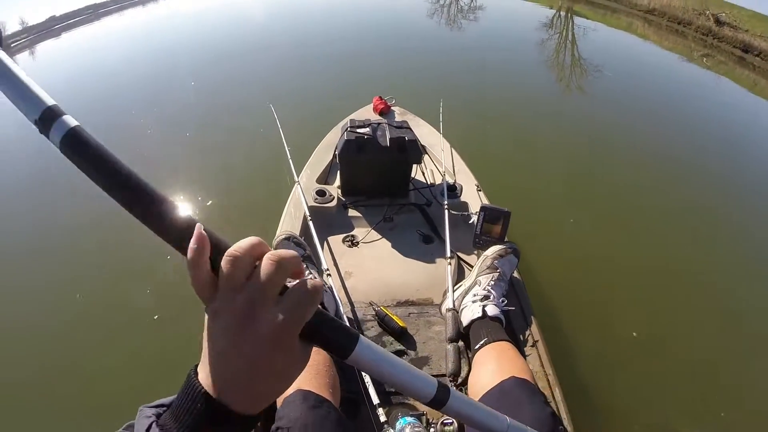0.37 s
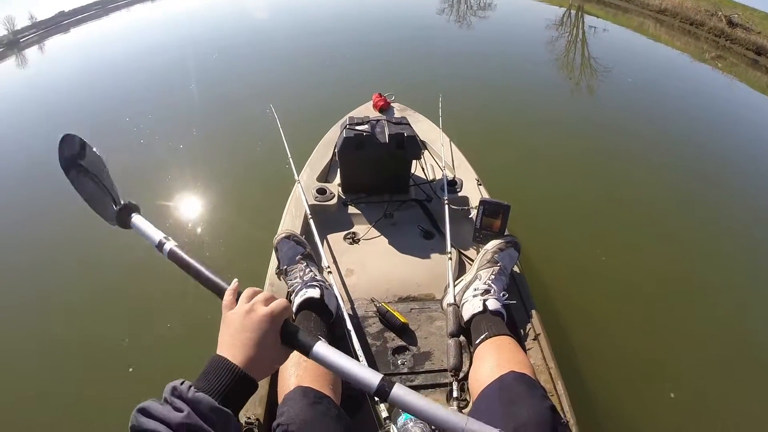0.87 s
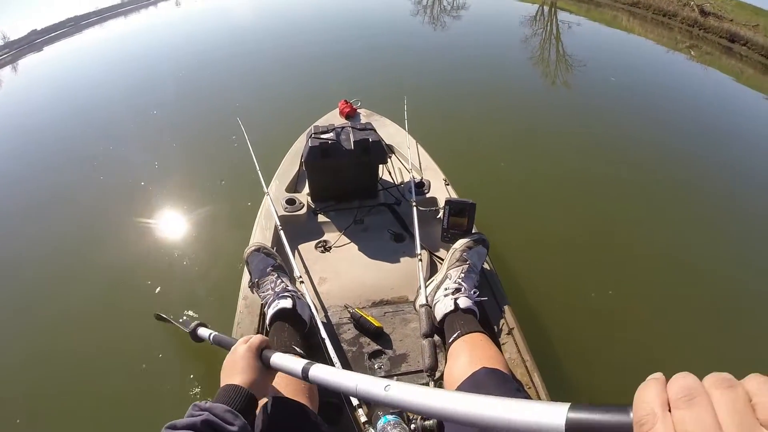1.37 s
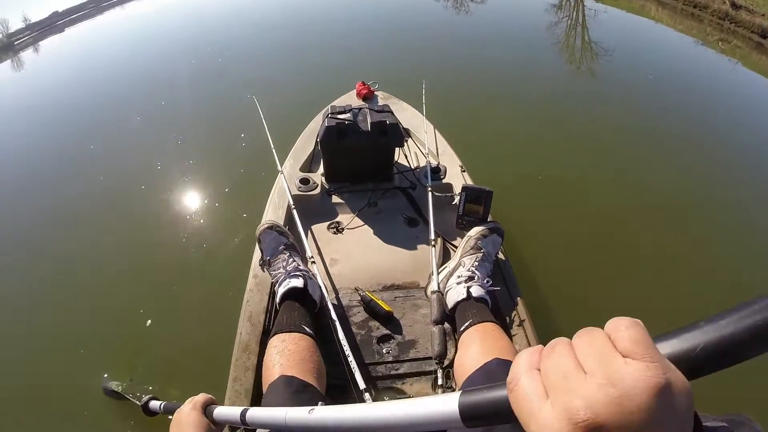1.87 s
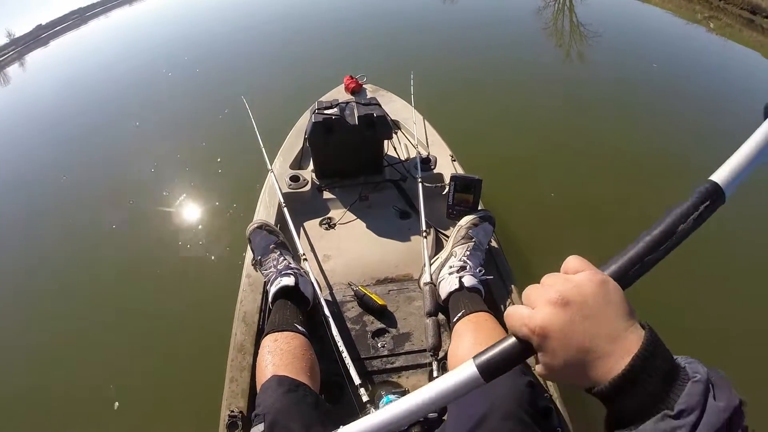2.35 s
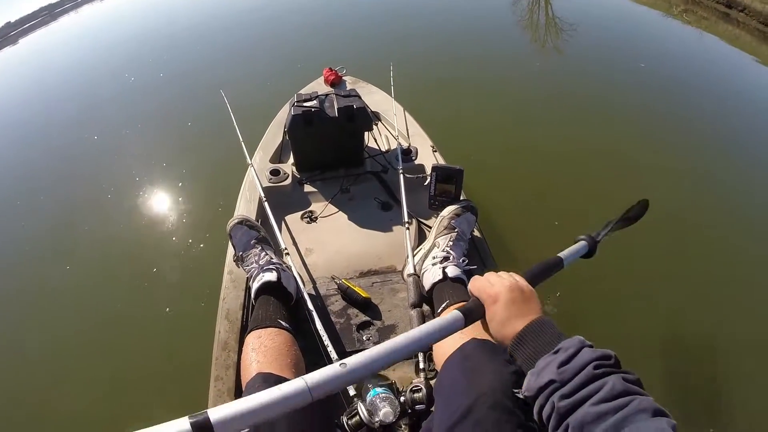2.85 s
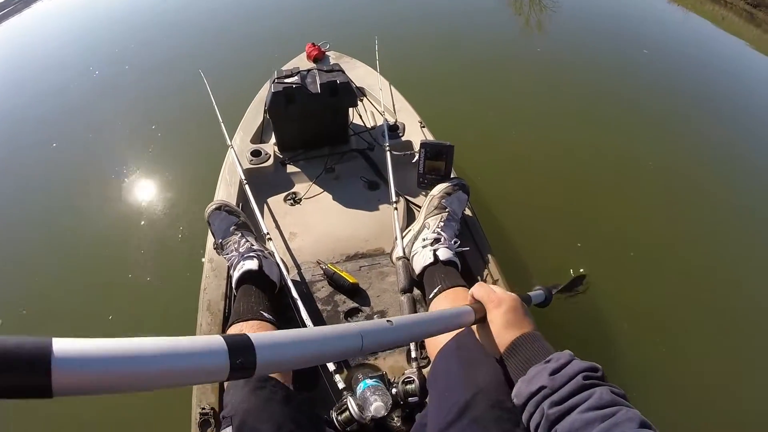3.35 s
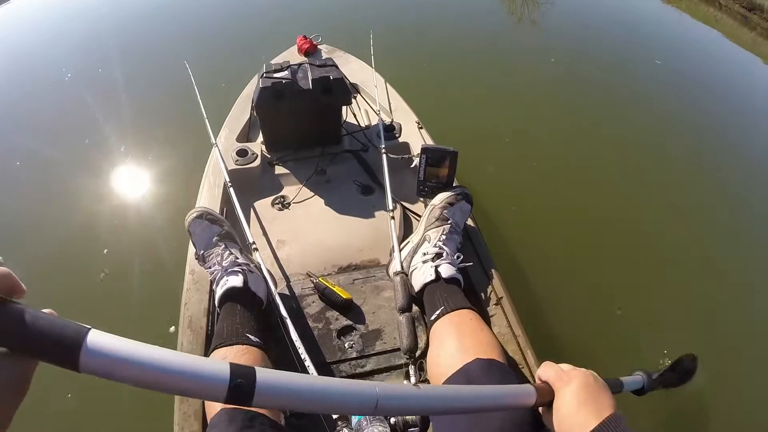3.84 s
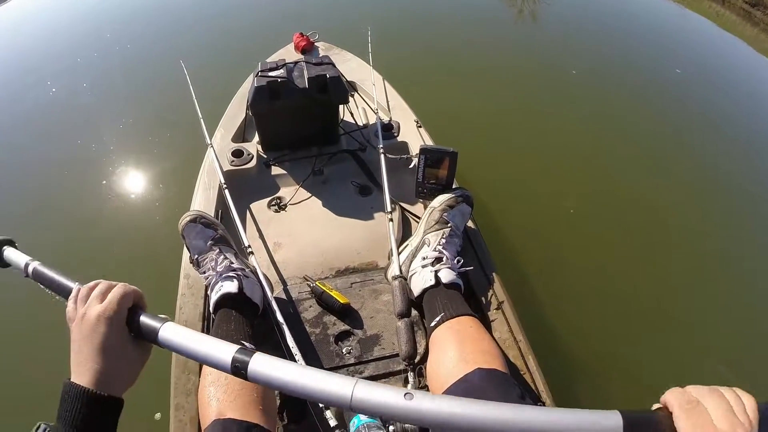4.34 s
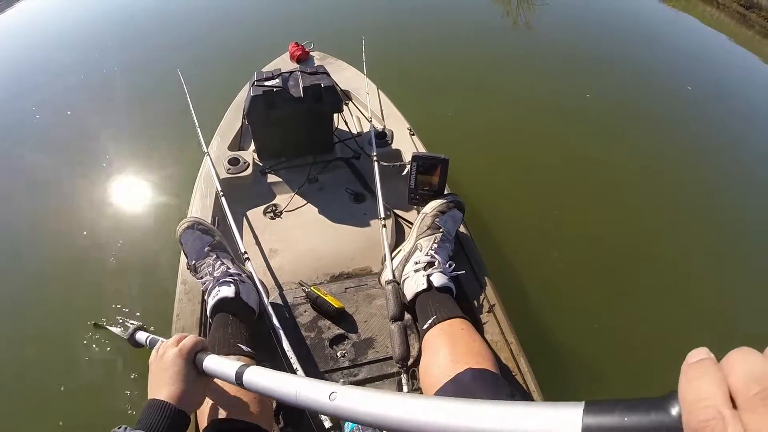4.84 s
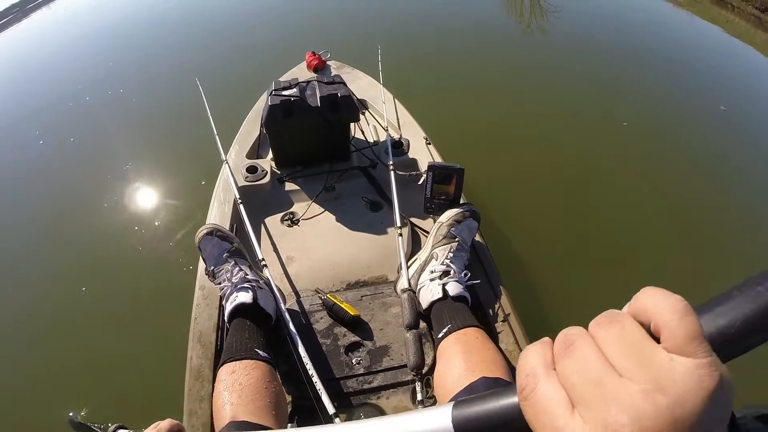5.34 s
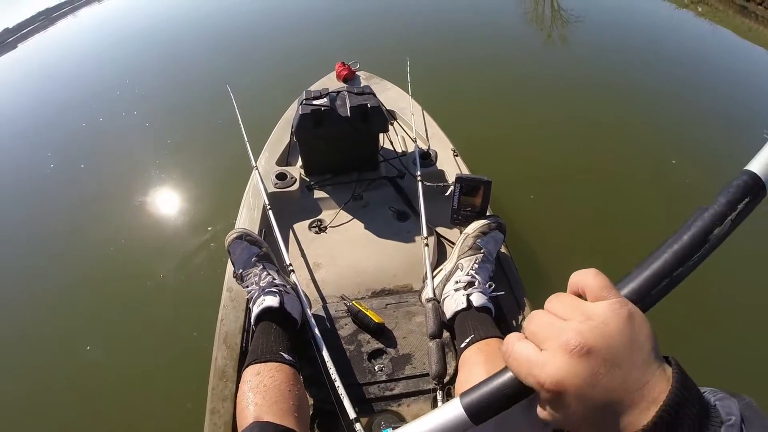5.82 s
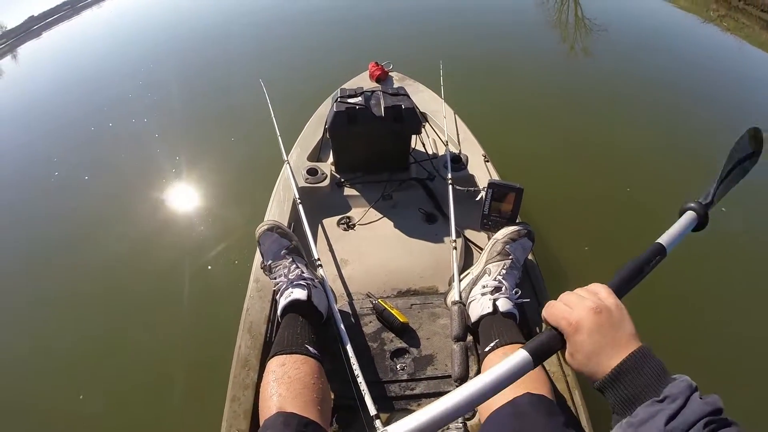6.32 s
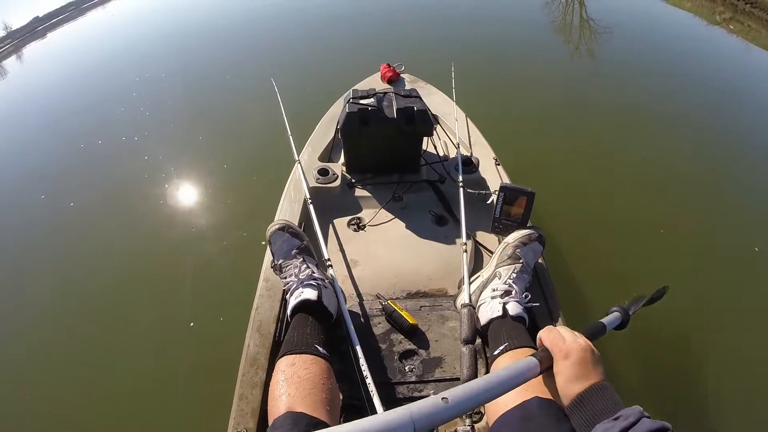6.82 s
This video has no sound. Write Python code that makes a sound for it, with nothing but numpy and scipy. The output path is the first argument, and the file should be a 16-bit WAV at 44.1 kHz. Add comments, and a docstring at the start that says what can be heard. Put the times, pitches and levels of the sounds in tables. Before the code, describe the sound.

Outdoors on a quiet pond, low distant road rumble runs throughout with vehicle drones swelling and fading. Up close, gentle paddle strokes gurgle, blip and drip, pausing between dips while water barely laps at the hull. Tiny clicks of wet gear and spray come and go, the shaft slides with hollow scrapes around the middle, and a last longer swirl of bubbles closes. Dry, near, slightly dull-topped pickup with faint electronic whine.

```python
"""Calm pond: a kayak is paddled slowly, heard by a small body-worn camera.
Far road: shaped noise, engine notes as wavering sines; a bird whistles; the camera whines in thin noise bands.
Shaft slides: stick-slip grains through resonances. Wet gear and spray tick as band-passed noise bursts.
Blade water: single bubbles are rising, dying sines behind a splat; trickle and spray are swarms of them."""
import sys
import numpy as np
from scipy import signal
from scipy.io import wavfile
from scipy.ndimage import uniform_filter1d

SR = 44100
rng = np.random.default_rng(int(sys.argv[2]) if len(sys.argv) > 2 else 0)


def elevation(decibels):
    """Turn decibel levels (scalar or array-like) into linear amplitude ratios."""
    levels = np.asarray(decibels, float)
    return 10 ** (levels / 20)


def transcribe(u):
    """Save the signal u as a 16-bit wav file named by the first command-line argument.

    u: samples, shape (n,) or (channels, n), limited to [-1, 1]; the rate is SR.
    q: integer samples, one column per channel.
    """
    v = np.clip(np.atleast_2d(u).T, -1, 1)
    q = np.round(v * 32767).astype(np.int16)
    wavfile.write(sys.argv[1], SR, q)


N = 317079


def evened(x):
    """Scales to an rms of 1."""
    return x / np.sqrt(np.mean(x ** 2) + 1e-20)


def curve(rows):
    """Start time, then each further column joined by straight lines at sample rate."""
    time_s, *columns = np.transpose(rows)
    t = np.arange(time_s[0], time_s[-1], 1 / SR)
    return (time_s[0], *(np.interp(t, time_s, column) for column in columns))


def add(mix, start_s, sound):
    """Mixes a sound in at start_s, cut at the end of the mix."""
    part = mix[round(start_s * SR):][:len(sound)]
    part += sound[:len(part)]


def resonate(x, hz, width_hz):
    """Shifts hz down to zero, smooths, and shifts back: a resonance of gain 1."""
    turn = np.exp(2j * np.pi * np.cumsum(hz * np.ones(len(x))) / SR)
    r = np.exp(-np.pi * width_hz / SR)
    smooth = signal.lfilter([1 - r], [1, -r], x / turn)
    return 2 * (turn * smooth).real


def wander(size, hz):
    """Slow random drift of rms 1 up to about hz."""
    low_pass = signal.butter(2, hz / SR * 2)
    drift = signal.lfilter(*low_pass, rng.standard_normal(size + SR))
    return evened(drift[SR:])  # drops the filter's settling


def ring(hz, t60_s, rise, onset_s):
    """A dying tone, as a bubble nearing the surface: pitch climbs by twice the share rise over t60_s."""
    t = np.arange(int(t60_s * SR) + 20) / SR
    turns = hz * (t + rise * t ** 2 / t60_s)
    return (1 - np.exp(-t / onset_s)) * elevation(-60 * t / t60_s) * np.sin(2 * np.pi * turns)


def tone(hz, level_db, flutter_db, flutter_hz, wobble):
    """A far tone: the air on its path makes level and pitch waver."""
    turns = np.cumsum(hz * (1 + wobble * wander(len(hz), flutter_hz))) / SR
    level = elevation(level_db + flutter_db * wander(len(hz), flutter_hz))
    level = level * signal.windows.tukey(len(hz), .04)
    return np.sqrt(2) * level * np.sin(2 * np.pi * (turns + rng.random()))


def bubbling(level_db, low_hz, high_hz, per_s, cycles, tilt, spread_db, clump_db):
    """A swarm of small bubbles at a median rate per_s, denser in clumps; each dies 60 dB in cycles."""
    clumps = elevation(clump_db * wander(N, 25))
    size = elevation(spread_db * np.minimum(rng.exponential(1, N), 4))
    size = size * (rng.random(N) < per_s * clumps / SR)
    kind = rng.integers(0, 26, N)
    out = np.zeros(N)
    for k, hz in enumerate(np.geomspace(low_hz, high_hz, 26)):
        grain = ring(hz, cycles / hz, 0.11, 0.086 / hz) * (hz / low_hz) ** tilt
        out += signal.oaconvolve(size * (kind == k), grain)[:N]
    return evened(out) * elevation(level_db)


# Spectral shape of the far road noise [frequency_hz, relative_level_db]
ROAD_SHAPE = [(20, -12), (40, -15), (60, -4), (110, -4), (160, -12), (215, -13.5), (270, -18), (450, -23.5),
              (780, -20), (1050, -26.5), (1400, -39.5), (2400, -40), (5000, -47.5), (9000, -54.5),
              (14500, -62), (15300, -54)]
RUMBLE_DB, ROAR_DB = -36, -50.5  # rms in 40-300 Hz; rms in 450-1100 Hz at the start
ROAR_FADE_DB_PER_S = 0.26


def road():
    """Far noise, faintly patchy in time and pitch: a low rumble and a slowly receding tyre roar."""
    frames, hz = N // 512 + 5, np.fft.rfftfreq(2048, 1 / SR)
    a, b, patches = rng.standard_normal((frames, 1025, 3)).T
    patches = uniform_filter1d(patches, size=16, axis=0)
    patches = evened(uniform_filter1d(patches, size=6, axis=1))
    shape_hz, shape_db = np.transpose(ROAD_SHAPE)
    smooth_db = np.interp(np.log(hz + 1), np.log(shape_hz + 1), shape_db)
    spectrum = elevation(smooth_db[:, None] + 0.35 * patches) * (a + 1j * b)
    low = 1 / (1 + (hz[:, None] / 350) ** 4)  # share of each bin that belongs to the rumble
    roar_db = ROAR_DB - ROAR_FADE_DB_PER_S * np.arange(N) / SR
    out = 0
    for share, level_db, band_hz in ((low, RUMBLE_DB, (40, 300)), (1 - low, roar_db, (450, 1100))):
        in_band = (hz > band_hz[0]) & (hz < band_hz[1])
        reference = signal.istft(spectrum * in_band[:, None], nperseg=2048, noverlap=1536)[1]
        noise = signal.istft(spectrum * share, nperseg=2048, noverlap=1536)[1][:N]
        out = out + noise / np.sqrt(np.mean(reference ** 2)) * elevation(level_db)
    return out


# Engine notes of far vehicles: speed [steady_hz, climb_from_s, climb_hz_per_s], swell [time_s, level_db]
ENGINE_NOTES = [((67.7, 3.4, 4.0), [(0, -62), (1, -40), (2.2, -37.5), (3.4, -32), (4.2, -42.5),
                (5.3, -45.5), (6.2, -42), (7.19, -30)]), ((91.8, 3.04, 0.304), [(0, -35.5), (1.1, -41.5),
                (1.9, -50), (3, -44.5), (3.7, -28), (4.15, -43), (4.8, -34.5), (5.4, -43), (7.19, -43.5)]),
                ((123, 3.53, 1.55), [(3.3, -56), (3.6, -38), (4.1, -47.5), (4.6, -41.5), (5.4, -42.5),
                (5.9, -62)]), ((126.6, 7.19, 0), [(0, -49.5), (2.6, -46), (5, -50), (7.19, -40.5)]),
                ((212, 3.5, 2.87), [(3.0, -55), (3.6, -51.5), (4.3, -47.5), (4.9, -57)]), ((112, 7.19, 0),
                [(4.1, -51), (4.5, -41.5), (5.2, -39), (5.7, -56)])]


def engine(speed, swell):
    """A steady note that climbs once the vehicle speeds up."""
    steady_hz, climb_from_s, climb_hz_per_s = speed
    start_s, level_db = curve(swell)
    t = start_s + np.arange(len(level_db)) / SR
    hz = steady_hz + climb_hz_per_s * np.maximum(t - climb_from_s, 0)
    return start_s, tone(hz, level_db, flutter_db=1.5, flutter_hz=2.83, wobble=0.0035)


# Faint steady whines of the camera [pitch_hz, width_hz, level_db]
CAMERA_WHINES = [(5110, 130, -78), (12647, 12, -89)]


def whines():
    """Thin resonant bands of electronic noise."""
    out = np.zeros(N)
    for hz, width_hz, level_db in CAMERA_WHINES:
        out += elevation(level_db) * evened(resonate(rng.standard_normal(N), hz, width_hz))
    return out


# Far bird whistles, level before shaping [start_s, length_s, first_hz, last_hz, level_db, bend]
# bend: under 1 the pitch falls early, over 1 late
BIRD_WHISTLES = [(2.15, .058, 3870, 3300, -68, 2.8), (2.33, .52, 3920, 3730, -67, .4)]


def whistle(start_s, length_s, first_hz, last_hz, level_db, bend):
    """A thin falling note, softened at its start and fading towards its end."""
    u = np.arange(0, 1, 1 / (length_s * SR))
    hz = first_hz + (last_hz - first_hz) * u ** bend
    shaped_db = level_db + 1 - 13 * length_s * u ** 3 - 4 * (1 - u) ** 12
    return start_s, tone(hz, shaped_db, flutter_db=2.2, flutter_hz=30, wobble=.006)


# Resonances of the hollow shaft [pitch_hz, half_width_hz of each of two passes, gain_db]
SHAFT_MODES = [(762, 96, 11), (2080, 230, 0.5), (2370, 140, 4.5), (2870, 100, -1.5), (3140, 83, -9),
               (3300, 3100, -6)]
# Pushes of the shaft over the boat, level before the mode gains [start_s, length_s, level_db, rise_s]
SHAFT_SLIDES = [(3.486, 0.3, -62.5, 0.011), (3.699, 0.27, -57.5, 0.069), (3.955, 0.31, -61, 0.011),
                (6.575, .14, -75, .03), (6.701, 0.21, -66, 0.026)]
SLIDE_RELEASE_S, SLIDE_FADE_DB = 0.041, -3.5  # fade: over the whole push


def slide(start_s, length_s, level_db, rise_s):
    """Uneven stick-slip grains excite the hollow shaft; each push builds and slackens."""
    t = np.arange(0, length_s, 1 / SR)
    grip = elevation(1.5 * wander(len(t), 30))
    slips = grip * rng.standard_normal((len(SHAFT_MODES), len(t)))
    slips = slips * (rng.random(len(t)) < 6000 / SR)  # 6000 grains/s on average
    creep = 1 + 0.011 * wander(len(t), 12)  # the contact point moves, so the resonances drift
    body = np.zeros(len(t))
    for grains, (hz, half_width_hz, gain_db) in zip(slips, SHAFT_MODES):
        once = resonate(grains, hz * creep, 2 * half_width_hz)
        body += elevation(gain_db) * evened(resonate(once, hz * creep, 2 * half_width_hz))
    edges = np.clip(np.minimum(t / rise_s, (length_s - t) / SLIDE_RELEASE_S), 0, 1)
    return start_s, elevation(level_db + SLIDE_FADE_DB * t / length_s) * body * edges


# Sharp ticks of spray, wet cloth and gear [start_s, peak_db, center_hz, width_hz]
WET_TICKS = [(0.423, -40, 2330, 2500), (0.6607, -32.5, 2500, 2800), (2.97, -49, 9000, 4000),
             (1.188, -34, 3460, 1960), (2.0, -46, 3520, 1000), (2.031, -44, 3760, 900),
             (2.445, -41.5, 1900, 1800), (2.5348, -35, 3040, 700), (2.575, -44.5, 7300, 3000),
             (2.671, -41.5, 8450, 6000), (2.716, -47, 8360, 1500), (2.9093, -46, 7800, 6000),
             (2.971, -32, 3570, 1100), (3.178, -38, 4840, 3000), (3.203, -40.5, 4970, 6000),
             (3.493, -47, 3000, 3000), (3.776, -44, 3500, 3000), (4.279, -44, 3000, 3000),
             (4.527, -44, 2810, 2000), (4.5357, -34.5, 2800, 2540), (4.5537, -43, 3000, 4000),
             (6.201, -34, 5760, 3500), (6.6694, -27.5, 6150, 8000), (6.8425, -42, 2491, 2000)]


def tick(center_hz, width_hz):
    """A snap inside a crackle a few milliseconds long, band-passed, peak 1."""
    t = np.arange(500) / SR
    burst = rng.standard_normal(500) * t / 0.00095 * np.exp(-t / 0.001)
    burst[40] = 3.3  # the snap itself
    edges_hz = np.clip([center_hz - width_hz / 2, center_hz + width_hz / 2], 300, 15000)
    burst = signal.sosfilt(signal.butter(3, edges_hz, "band", fs=SR, output="sos"), burst)
    return burst / abs(burst).max()


# Fine spray crackling off a lifted blade [time_s, level_db]
BLADE_SPRAY = [(2.5, -95), (2.62, -74), (2.8, -75), (3.25, -80)]


def spray():
    """Sparse tiny droplets bursting, far up in the treble."""
    time_s, spray_db = np.transpose(BLADE_SPRAY)
    level_db = np.interp(np.arange(N) / SR, time_s, spray_db, right=spray_db[0])
    return bubbling(level_db, 4500, 11000, per_s=70, cycles=16, tilt=0, spread_db=2.5, clump_db=3)


# Blade stirs or sheds water [full_from_s, hold_s, fine_trickle_db, deep_gurgle_db]
BLADE_STIRS = [(0.587, 0.32, -60.5, -44.5), (1.237, 0.045, -62, -57), (2.6, 0.15, -62.5, -48.5),
               (3.8, 0.46, -65.5, -53.5), (6.233, 1, -66.5, -53)]
STIR_RISE_DB_PER_S, STIR_FALL_DB_PER_S = 38, 18
LAP_FINE_DB, LAP_DEEP_DB = -68, -68  # water always lapping at the hull
DRIPS_PER_S, DRIP_DB = 160, -2  # stray small drops; level relative to the fine trickle


def trickle():
    """Fine bubbles at the blade edge, a deeper swirl behind it and stray drops, over hull lapping."""
    full_from_s, hold_s, fine_db, deep_db = np.transpose(BLADE_STIRS)[:, :, None]
    t = np.arange(N) / SR
    away_db = STIR_RISE_DB_PER_S * np.maximum(full_from_s - t, 0)
    away_db = away_db + STIR_FALL_DB_PER_S * np.maximum(t - full_from_s - hold_s, 0)
    fine_db = np.maximum((fine_db - away_db).max(0), LAP_FINE_DB)
    deep_db = np.maximum((deep_db - away_db).max(0), LAP_DEEP_DB)
    fine = bubbling(fine_db, 1476, 5100, per_s=1300, cycles=10.5, tilt=-0.39, spread_db=2.5, clump_db=4.0)
    deep = bubbling(deep_db, 430, 1018, per_s=600, cycles=30, tilt=1.0, spread_db=3, clump_db=3.5)
    drips = bubbling(fine_db + DRIP_DB, 1500, 4580, per_s=DRIPS_PER_S, cycles=34, tilt=-0.26,
                     spread_db=2.0, clump_db=4.5)
    return fine + deep + drips


# Bubbles ringing where a drop lands or a blade traps air, level before the shake
# [start_s, level_db, first_hz, ring_cycles to -60 dB]
RINGING_BUBBLES = [(0.47, -34, 713, 90), (0.66, -25.5, 754, 18), (0.7113, -37.5, 2000, 37),
                   (0.799, -33, 780, 34), (.818, -37.5, 2250, 39), (.835, -42, 2400, 72),
                   (.855, -38, 3300, 48), (0.938, -40, 3130, 41), (.958, -42, 2760, 30),
                   (1.06, -44, 2240, 71), (1.175, -40, 2170, 140), (1.195, -34, 574, 32),
                   (1.199, -39, 1900, 25), (1.247, -34, 1070, 39), (1.276, -37, 1220, 24),
                   (1.308, -43, 1720, 39), (1.706, -41, 2140, 40), (2.029, -30, 863, 20),
                   (2.061, -36.5, 2540, 35), (2.4154, -45, 2640, 40), (2.537, -43, 1850, 30),
                   (2.5714, -36.5, 1580, 35), (2.646, -41, 1750, 43), (2.7344, -43, 3400, 33),
                   (2.773, -42, 2280, 36), (2.974, -42, 1680, 30), (3.252, -37.5, 2220, 18),
                   (3.682, -44, 1500, 70), (4.01, -31.5, 804, 74), (4.2057, -41, 1530, 50),
                   (4.553, -30.5, 1007, 96), (4.721, -40.5, 912, 140), (4.765, -45.5, 2060, 76),
                   (5.935, -33.5, 925, 29), (6.204, -39.5, 1780, 37), (6.22, -44, 3230, 43),
                   (6.232, -37, 2080, 88), (6.249, -34, 2670, 30), (6.306, -41.5, 767, 68),
                   (6.44, -38.5, 718, 100), (6.523, -37.5, 980, 90), (6.555, -39, 1125, 68),
                   (6.67, -34.5, 2260, 39), (6.718, -36, 796, 47)]
# Air pinched off at the surface, pitch shoots up [start_s, level_db, first_hz, ring_cycles to -60 dB]
SURFACE_PLOPS = [(0.915, -36, 1200, 46), (1.1513, -44, 1770, 55), (6.718, -45, 1820, 50),
                 (6.858, -48, 2060, 50)]
BUBBLE_RISE_AT_1KHZ, PLOP_RISE = 0.143, 0.9  # half the pitch climb as a share; bubbles: inverse to pitch
ONSET_CYCLES = 0.48
SPLAT_DB, SPLAT_PITCH, SPLAT_WIDTH = -13, 1.5, 2  # relative to the bubble's level and pitch
SHAKE_DB, SHAKE_PITCH = 2.5, .018


def bubble(level_db, first_hz, cycles, rise):
    """A wet splat, then the trapped air rings, shaken in level and pitch by the churning water."""
    out = np.zeros(int(cycles / first_hz * SR) + 520)
    add(out, 0, ring(first_hz, cycles / first_hz, rise, ONSET_CYCLES / first_hz))
    warp = np.cumsum(1 + SHAKE_PITCH * wander(len(out), first_hz / 8))
    shake_db = SHAKE_DB * np.tanh(wander(len(out), first_hz / 8))
    out = np.interp(warp, np.arange(len(out)), out) * elevation(shake_db)
    add(out, 0, elevation(SPLAT_DB) * tick(SPLAT_PITCH * first_hz, SPLAT_WIDTH * first_hz))
    return elevation(level_db) * out


def echo_of(near):
    """Short echo from deck and water: sparse random reflections dying 60 dB in 25 ms."""
    t = np.arange(1500) / SR
    echo = rng.choice([-1., 1.], 1500) * (rng.random(1500) < .15) * elevation(-60 * t / .025)
    echo *= elevation(-13) / np.linalg.norm(echo)
    return signal.oaconvolve(near, echo)[:N]


def scene():
    """Everything at the microphone; only near sounds get the echo."""
    far, near = road() + whines(), trickle() + spray()
    for row in ENGINE_NOTES:
        add(far, *engine(*row))
    for row in BIRD_WHISTLES:
        add(far, *whistle(*row))
    for row in SHAFT_SLIDES:
        add(near, *slide(*row))
    for start_s, peak_db, center_hz, width_hz in WET_TICKS:
        add(near, start_s, elevation(peak_db) * tick(center_hz, width_hz))
    for start_s, level_db, first_hz, cycles in RINGING_BUBBLES:
        add(near, start_s, bubble(level_db, first_hz, cycles, BUBBLE_RISE_AT_1KHZ * 1000 / first_hz))
    for start_s, level_db, first_hz, cycles in SURFACE_PLOPS:
        add(near, start_s, bubble(level_db, first_hz, cycles, PLOP_RISE))
    return (far + near + echo_of(near))[None]


def band_limit(x):
    """A steep low-pass at the top of the band."""
    return signal.sosfilt(signal.butter(12, 15810, fs=SR, output="sos"), x)


def record(dry):
    """The camera's band limit: a linear-phase low-pass at 15350 Hz."""
    low_pass = signal.firwin(511, 15350, window=("kaiser", 9), fs=SR)
    limited = signal.oaconvolve(dry, low_pass[None], "same")
    return band_limit(limited)


dry = scene()
out = record(dry)
transcribe(out)
```